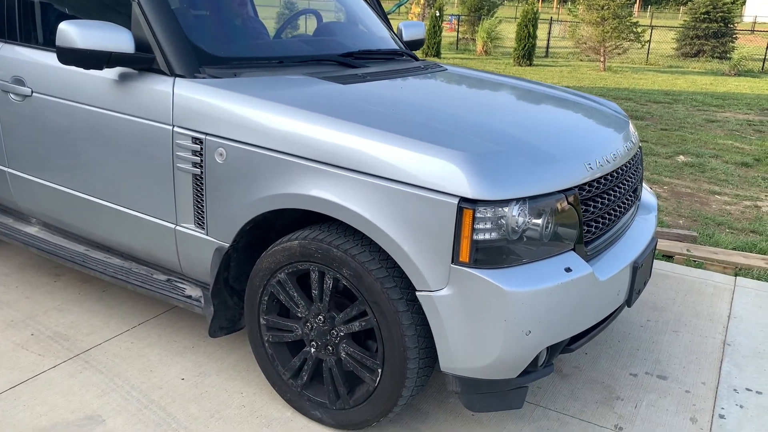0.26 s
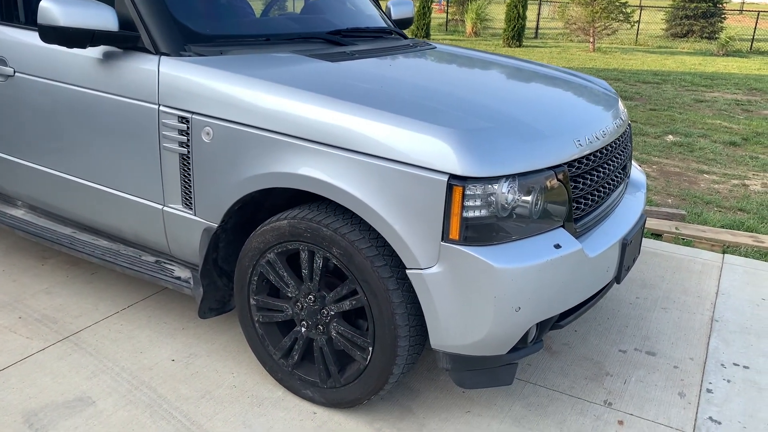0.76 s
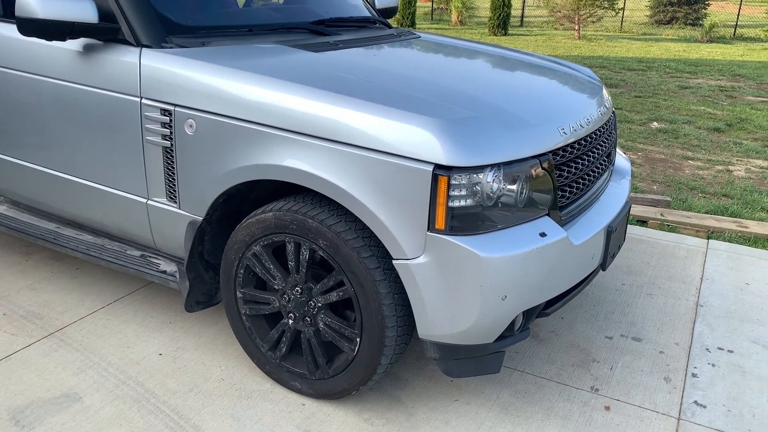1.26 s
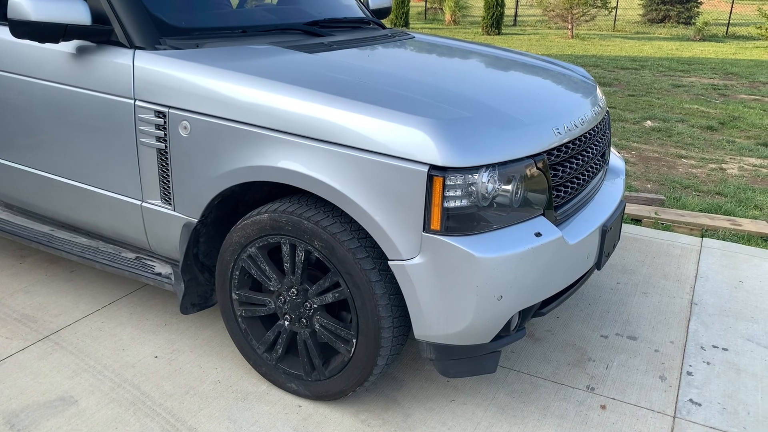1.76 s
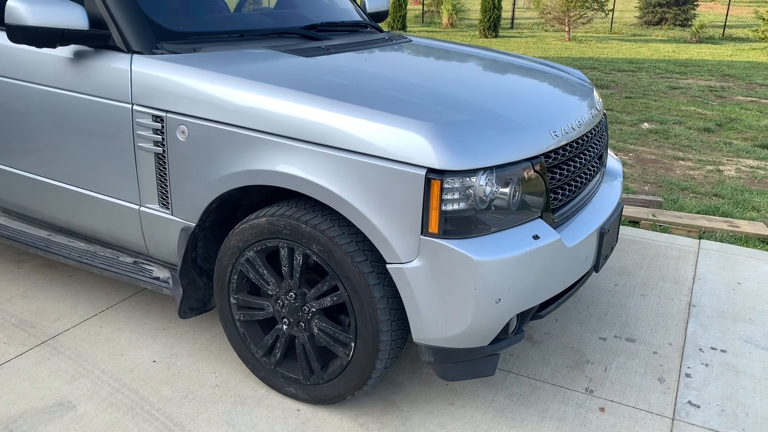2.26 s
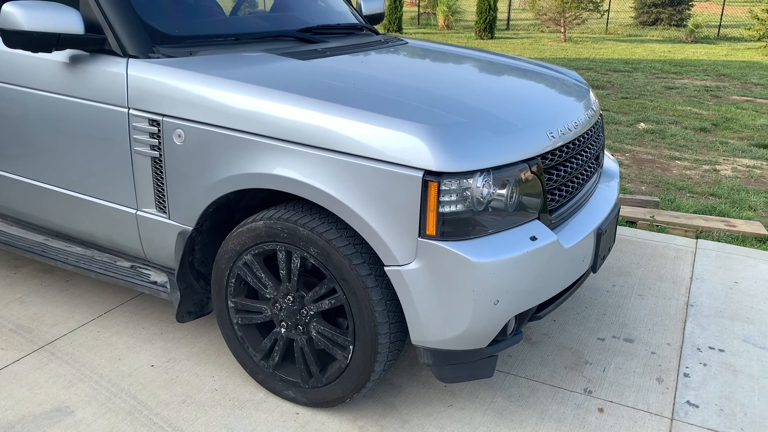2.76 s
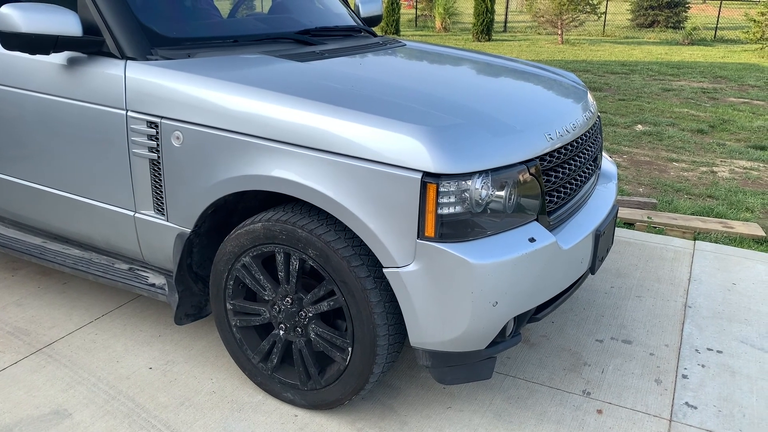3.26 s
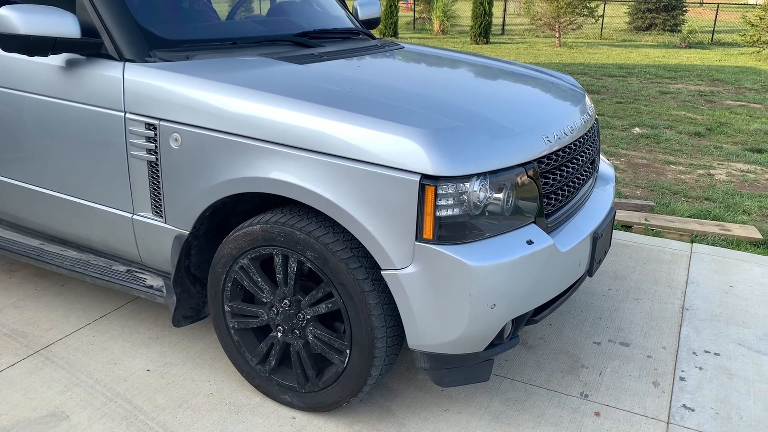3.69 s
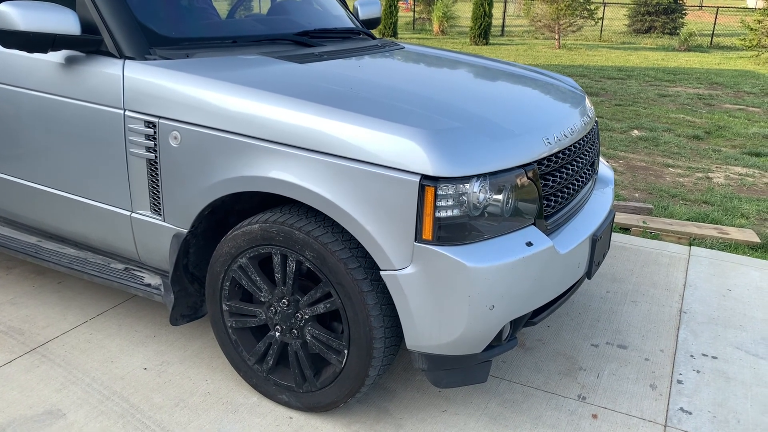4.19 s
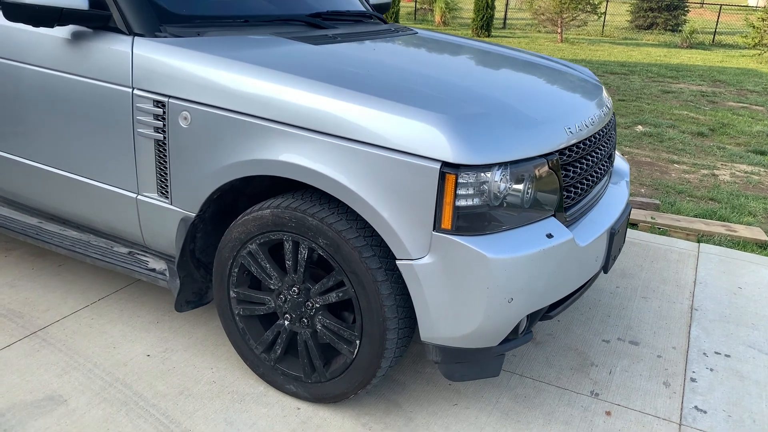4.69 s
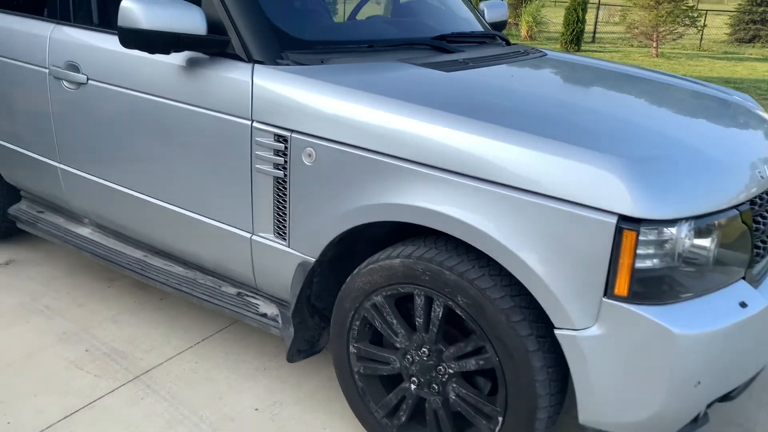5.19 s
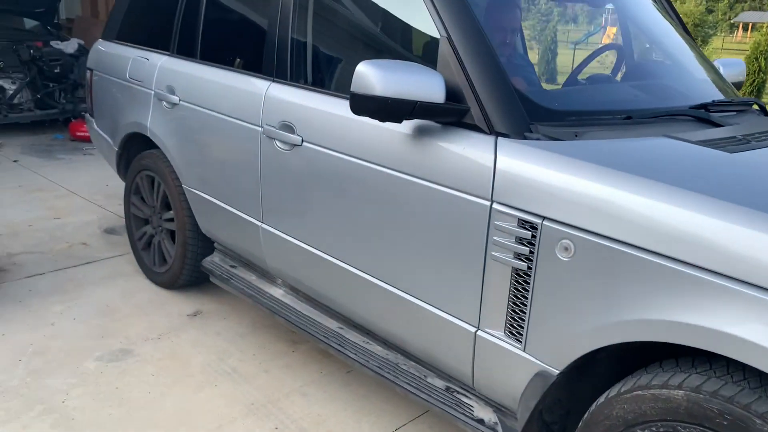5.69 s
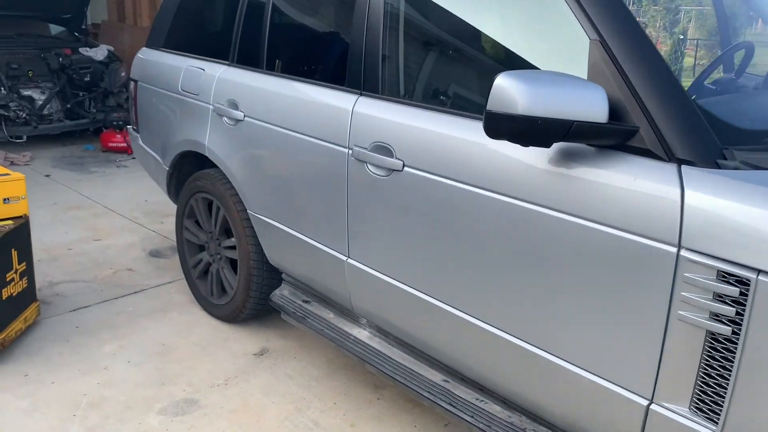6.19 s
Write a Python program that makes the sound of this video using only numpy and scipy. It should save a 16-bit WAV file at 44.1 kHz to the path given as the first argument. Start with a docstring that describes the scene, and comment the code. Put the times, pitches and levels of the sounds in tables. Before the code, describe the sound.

A petrol V8 idles fast outdoors with a dying belt rasp, settles lower, ticking and humming while breeze thumps the microphone.

```python
"""A fast idle with a belt rasp that dies away: a petrol V8 just started on a driveway, sinking to about 670 rpm.
The exhaust hums as sines on the crank orders, uneven knocks ring filters of the block near 1 kHz,
and valve ticks swell the shaped noise of clatter and of belt-and-fan hiss.
Puffs of breeze, short bursts of low noise, buffet the hand-held microphone.
Near the end it turns from the bonnet to the flank of the car."""
import sys
import numpy as np
from scipy import signal
from scipy.fft import rfft, irfft
from scipy.io import wavfile
from scipy.ndimage import uniform_filter1d, map_coordinates

SR = 44100
rng = np.random.default_rng(int(sys.argv[2]) if len(sys.argv) > 2 else 0)


def wav_record(signal):
    """Record a signal, one row per channel, as 16-bit PCM in the file named by sys.argv[1]."""
    frames = np.transpose(np.atleast_2d(signal))
    bounded = np.clip(frames, -1, 1)
    # unit amplitude maps onto the largest positive 16-bit level
    quanta = np.round(bounded * 32767).astype(np.int16)
    wavfile.write(sys.argv[1], SR, quanta)


N = 284004
TIME = np.arange(N) / SR
HZ = np.maximum(np.arange(N // 2 + 1) * SR / N, 1)
SIDES = np.array([[1], [-1]])  # left, right
IDLE_REV_PER_S, FAST_IDLE_REV_PER_S = 11.2, 14.6


def from_db(db):
    """Decibels to gain."""
    return 10 ** (np.asarray(db) / 20)


def rms_one(x):
    """Scale to unit power."""
    return x / np.sqrt(np.mean(x ** 2) + 1e-20)


def in_time(rows):
    """Each column of a curve at every sample."""
    s, *columns = np.transpose(rows)
    return [np.interp(TIME, s, column) for column in columns]


def at_hz(points):
    """A table over log frequency at every FFT bin."""
    hz, value = np.transpose(points)
    return np.interp(np.log(HZ), np.log(hz), value)


def drift(rate_per_s):
    """Slow chance with spread 1."""
    knots = rng.standard_normal(1024)
    return np.interp(TIME * rate_per_s, np.arange(len(knots)), knots) * np.sqrt(3 / 2)


def band(x, low_hz, high_hz, order=2):
    """Butterworth band-pass."""
    return signal.sosfilt(signal.butter(order, [low_hz, high_hz], "band", fs=SR, output="sos"), x)


def low_pass(order, cutoff_hz):
    """Butterworth low-pass sections."""
    return signal.butter(order, cutoff_hz, fs=SR, output="sos")


def lag_left(x, lag_s):
    """Delay the left side against the right (a negative lag advances it), reading between samples."""
    fine = signal.resample_poly(x[0], 4, 1)
    left = np.interp((TIME - lag_s) * SR * 4, np.arange(len(fine)), fine)
    return np.array([left, x[1]])


# likeness of the engine's noise on the two sides: (frequency [Hz], correlation [-1 to 1])
LIKENESS = [(50, 0.58), (170, 0.62), (400, 0.78), (700, .15), (1100, 0.78), (1600, 0.57), (2200, 0.65),
            (3100, 0), (4200, 0.74), (6000, 0)]


def machine_noise(turns, spectrum, repeat, likeness=LIKENESS):
    """Coloured stereo noise of unit power; a share of it repeats with every revolution."""
    grid = np.linspace(0, 1, 4096)
    rows = rng.standard_normal((2, len(grid)))
    cycle = np.array([rms_one(np.interp(turns % 1, grid, row)) for row in rows])
    fresh = rng.standard_normal((2, N))
    mid, side = rfft(np.sqrt(repeat) * cycle + np.sqrt(1 - repeat) * fresh)
    alike = np.clip(at_hz(likeness), -1, 1)
    both = np.sqrt(1 + alike) * mid + np.sqrt(1 - alike) * side * SIDES
    return rms_one(irfft(both * from_db(at_hz(spectrum)), N))


def fast_share(speed):
    """0 at the settled idle, 1 at the fast idle."""
    return (speed - IDLE_REV_PER_S) / (FAST_IDLE_REV_PER_S - IDLE_REV_PER_S)


def part_level(speed, flank, idle_db, fast_db, arch_db, flank_db):
    """Level in dB of an engine part: idle level plus gains at fast idle, by the wheel arch (halfway) and flank."""
    arch = 4 * flank * (1 - flank)
    return idle_db + fast_db * fast_share(speed) + arch_db * arch + flank_db * flank


def beat_times(turns, positions, jitter_s):
    """When the crank passes each position, a little early or late: one row per revolution."""
    due = np.arange(int(turns[-1]) + 1)[:, None] + positions
    return np.interp(due, turns, TIME, right=-1) + jitter_s * rng.standard_normal(due.shape)


def beats(s, db, spread_db):
    """A click at each time, each a little off in strength."""
    gain = from_db(db + spread_db * rng.standard_normal(s.shape))
    heard = (s > 0) & (s < TIME[-1])
    return np.bincount((s[heard] * SR).astype(int), gain[heard], N)


def fade(clicks, decay_s):
    """Each click becomes an envelope that dies away; unit power."""
    return rms_one(signal.lfilter([1], [1, -np.exp(-1 / (decay_s * SR))], clicks + 1e-18))


GUST_ROUNDNESS = 1.5


def swell(s, attack_s, release_s):
    """Attack and release with soft skirts."""
    return np.exp(-1.7 * np.abs(s / np.where(s < 0, attack_s, release_s)) ** GUST_ROUNDNESS)


WIDE_BELOW_HZ = 230  # the deepest eddies differ most between the sides


def eddies(bottom_hz, top_hz, knee_share, width, size):
    """Low stereo noise of even loudness between two edges, sloping down from a knee."""
    hz = np.fft.rfftfreq(size, 1 / SR) + 1
    bottom_edge = 1 + (bottom_hz / hz) ** 8
    knee = 1 + (hz / (knee_share * top_hz)) ** 2
    top_edge = 1 + (hz / top_hz) ** 14
    power = 1 / (bottom_edge * knee * top_edge)
    flow = irfft(rfft(rng.standard_normal((2, size))) * np.sqrt(power))
    mid, side = flow / np.sqrt(uniform_filter1d(flow ** 2, size=SR // 50) + 1e-12)
    side = signal.sosfilt(low_pass(1, WIDE_BELOW_HZ), side)
    return mid + width * side * SIDES


# gusts on the microphone:
# (peak time [s], level [dB], rise [s], fall [s], bottom edge [Hz], top edge [Hz])
GUSTS = [(0.37, -24.5, .04, 0.065, 58, 126), (0.843, -24, 0.024, 0.024, 50, 130),
         (0.896, -19.5, 0.033, 0.04, 55, 159), (0.974, -25.5, 0.038, 0.062, 54.6, 148),
         (1.156, -15.5, 0.029, 0.019, 47.7, 123), (1.175, -15.5, .014, 0.025, 270, 420),
         (1.205, -23.5, 0.077, 0.073, 50, 460), (1.247, -23, 0.02, 0.021, 201, 480),
         (1.44, -31, .025, 0.035, 79.3, 180), (1.518, -25, 0.029, 0.037, 75, 185),
         (1.666, -19, .012, 0.0099, 80.6, 238), (2.026, -27, .017, 0.057, 57.4, 297),
         (2.098, -13, .018, 0.032, 44.7, 292), (2.16, -26.5, 0.039, 0.02, 230, 357),
         (2.208, -23.5, 0.027, 0.053, 99, 373), (2.365, -14.5, 0.031, 0.02, 60, 218),
         (2.409, -15.5, 0.06, 0.067, 51.3, 384), (2.596, -22, .025, 0.018, 77, 257),
         (2.683, -15.5, .003, .018, 240, 720), (2.686, -12.5, .009, .019, 85, 240),
         (2.726, -18.5, .02, .01, 80, 280), (2.749, -18.5, .011, .033, 100, 450),
         (2.819, -27, .01, 0.017, 66, 163), (3.09, -29, .012, 0.025, 110, 420),
         (3.45, -30.5, 0.035, .04, 90, 260), (4.841, -18, 0.025, 0.021, 88, 253),
         (4.895, -17, .019, .025, 55.3, 140), (4.93, -17, .012, 0.011, 84, 222),
         (4.979, -23.5, 0.014, 0.012, 172, 280), (5.257, -15.5, 0.013, .016, 68.3, 163),
         (5.528, -17.5, .013, 0.017, 51.9, 120), (5.752, -18.5, 0.04, 0.036, 49.7, 497),
         (5.796, -17, 0.015, 0.016, 132, 280), (5.815, -24.5, 0.018, 0.017, 110, 500),
         (5.97, -27, .053, 0.12, 87, 322), (6.067, -18.5, .01, 0.012, 159, 420)]
FLUTTER_DB, FLUTTER_PER_S = 1, 90  # the gusts break into lumps


def wind(knee_share, width):
    """Each gust swells and dies on the microphone ports, fluttering as it goes."""
    out = np.zeros((2, N))
    size = 16384
    s_from_peak = (np.arange(size) - size / 2) / SR
    for s, db, rise_s, fall_s, bottom_hz, top_hz in GUSTS:
        start = int(s * SR) - size // 2
        gust = swell(s_from_peak, rise_s, fall_s) * eddies(bottom_hz, top_hz, knee_share, width, size)
        out[:, start:start + size] += from_db(db) * gust
    return out * from_db(FLUTTER_DB * drift(FLUTTER_PER_S))


# valve closings of one revolution: (crank position [turns], clatter tick [dB], hiss tick [dB])
TICKS = [(.01, 5, -3), (.2, -15, -6), (.37, 11.5, 1), (.48, 6.5, 17.5), (.61, -2, -7), (.73, 4.5, 11),
         (.85, 5, 16)]


def valve_ticks(turns, tick_db, depth, decay_s, spread_db):
    """Gain that flares up at each valve closing; unit power."""
    s = beat_times(turns, np.array(TICKS)[:, 0], jitter_s=.0006)
    ticks = uniform_filter1d(fade(beats(s, tick_db, spread_db), decay_s), size=SR // 400)
    return rms_one(np.sqrt(1 + (depth * ticks) ** 2))


# spectrum of the belt-and-fan hiss: (frequency [Hz], relative density [dB per Hz])
HISS = [(1000, 2), (2800, -0.5), (3600, 8.5), (4600, 2.5), (5500, 2), (7000, 1), (8000, 1.5), (9000, -0.5),
        (10500, -3), (11800, -0.5), (13400, -0.5), (14300, 3), (14800, -19), (16000, -30)]
# likeness of the hiss on the two sides: (frequency [Hz], correlation [-1 to 1])
HISS_LIKENESS = [(3000, 0), (4300, 0.055), (5300, 0.019), (7000, 0.45), (8600, 0.5), (9800, 1), (14000, 1)]
# level at the settled idle; gains at fast idle, wheel arch, flank [dB]
HISS_DB = dict(idle_db=-38.5, fast_db=1.5, arch_db=1.5, flank_db=-1.5)
HISS_LAG_S = .000297


def belt_and_fan_hiss(turns, speed, flank):
    """Belts and fan hiss as high noise, in which the valves tick briefly."""
    level_db = part_level(speed, flank, **HISS_DB) + 0.78 * drift(8)
    noise = machine_noise(turns, HISS, repeat=0.18, likeness=HISS_LIKENESS)
    tick_db = np.array(TICKS)[:, 2]
    return from_db(level_db) * noise * valve_ticks(turns, tick_db, depth=0.31, decay_s=0.0025, spread_db=2.5)


# spectrum of the belt's rasp: (frequency [Hz], relative density [dB per Hz])
RASP = [(900, -13), (1250, 1), (1700, 5.5), (2200, -4), (3000, 4), (3700, -4), (4600, 5), (5600, -1),
        (7000, -6), (10300, -4.5), (14400, -10), (14900, -30)]
RASP_DB, RASP_FALL_DB_PER_S = -36, 8


def belt_rasp(turns, grains_per_s, grain_s, spread_db):
    """Just after the start the belt rasps on its pulleys in tiny slips; this dies away."""
    s = np.cumsum(rng.exponential(1 / grains_per_s, 4096))
    grain = fade(beats(s, 0, spread_db), grain_s)
    noise = machine_noise(turns, RASP, repeat=0.24, likeness=HISS_LIKENESS)
    return from_db(RASP_DB - RASP_FALL_DB_PER_S * TIME) * grain * noise


# spectrum of the air drawn in: (frequency [Hz], relative density [dB per Hz])
INTAKE = [(150, -24), (270, -8), (345, -3.5), (440, -.5), (540, -13.5), (750, -18), (1500, -51)]
# likeness of the intake on the two sides, clipped to -1..1: (frequency [Hz], correlation)
INTAKE_LIKENESS = [(200, 0), (290, -1.3), (400, 0.71), (700, -0.29)]
# level at the settled idle; gains at fast idle, wheel arch, flank [dB]
INTAKE_DB = dict(idle_db=-49.5, fast_db=13, arch_db=1, flank_db=-12.5)


def air_intake(turns, speed, flank):
    """Drawn-in air rushes as noise, partly repeating each revolution; strongest at the fast idle."""
    noise = machine_noise(turns, INTAKE, repeat=0.44, likeness=INTAKE_LIKENESS)
    return from_db(part_level(speed, flank, **INTAKE_DB)) * noise


# spectrum of the rumble: (frequency [Hz], relative density [dB per Hz])
RUMBLE = [(15, -34), (25, -22), (35, -12), (50, 3), (75, 1), (130, 2), (200, -4.5), (290, -8), (380, -6),
          (450, -17), (530, -20), (800, -12.5), (1500, -53)]
# level at the settled idle; gains at fast idle, wheel arch, flank [dB]
RUMBLE_DB = dict(idle_db=-33.5, fast_db=-0.5, arch_db=3, flank_db=0)


def engine_rumble(turns, speed, flank):
    """Low noise, partly repeating each revolution, its level wavering."""
    level_db = part_level(speed, flank, **RUMBLE_DB) + 2.74 * drift(14)
    return from_db(level_db) * machine_noise(turns, RUMBLE, repeat=0.23)


PANEL_RIPPLE_DB, PANEL_SPACING_HZ, PANEL_CHANGES_PER_S = 2.3, 40, 1.5


def panel_ripple(hz, s):
    """Small panel modes leave fine peaks and dips, shifting slowly as the hand moves; dB by frequency and time."""
    place = np.meshgrid(hz / PANEL_SPACING_HZ, s * PANEL_CHANGES_PER_S, indexing="ij")
    return PANEL_RIPPLE_DB * map_coordinates(rng.standard_normal((600, 16)), place, order=3, mode="mirror")


# resonances of covers and brackets, before waver and losses:
# (centre [Hz], width [Hz], height [dB])
COVERS = [(804, 56, 5.5), (1268, 44, 6), (1535, 41, 4.5), (1704, 61, 5.5), (2025, 42, 5.5), (2120, 30, 2),
          (2207, 39, 5), (2410, 68, 2.5), (3130, 41, 4), (3586, 116, 6), (3930, 60, 4), (4226, 71, 7.5),
          (4580, 430, 5.5), (5550, 42, -6), (6810, 115, 6), (7590, 150, 6.5), (8090, 230, 5),
          (8230, 230, 5), (10730, 310, 5)]
# shares of height: waver, loss on the flank, loss at fast idle; share of pitch: wander
COVER_WAVER, COVER_FLANK_LOSS, COVER_FAST_LOSS, COVER_WANDER = 0.3, .21, .45, .008
FLANK_TREBLE_DB, FLANK_TREBLE_HZ = 4.5, 12500  # the flank lets out more of the highest hiss


def covers(x, flank, speed):
    """Covers and brackets colour the sound; each resonance wavers in height and wanders in pitch."""
    hz, s, frames = signal.stft(x, SR, nperseg=2048)
    along = np.interp(s, TIME, flank)
    fast = np.clip(fast_share(np.interp(s, TIME, speed)), 0, 1)
    treble_db = FLANK_TREBLE_DB / (1 + (FLANK_TREBLE_HZ / (hz + 1)) ** 12)
    gain_db = np.outer(treble_db, along) + panel_ripple(hz, s)
    kept = 1 - COVER_FLANK_LOSS * along - COVER_FAST_LOSS * fast
    for centre_hz, width_hz, db in COVERS:
        share = (1 + COVER_WAVER * np.interp(s, TIME, drift(7))) * kept
        moved_hz = centre_hz * (1 + COVER_WANDER * np.interp(s, TIME, drift(3)))
        gain_db = gain_db + db * share / (1 + (2 * (hz[:, None] - moved_hz) / width_hz) ** 2)
    return signal.istft(frames * from_db(gain_db), SR)[1][:, :N]


# clatter through the grille: (frequency [Hz], relative density [dB per Hz])
GRILLE_CLATTER = [(250, -13), (450, -3), (600, -9.5), (900, 1), (1200, 5), (1450, 0), (1900, 0),
                  (2400, 3.5), (3000, -4), (4500, -8.5), (7000, -15.5), (15000, -43)]
# clatter out of the wheel arch: (frequency [Hz], relative density [dB per Hz])
ARCH_CLATTER = [(250, -10), (500, 8), (660, 0.5), (850, 9), (1150, 8.5), (1430, 5), (1900, 2.5), (2300, 1),
                (2700, 0), (3100, -1), (3600, 3.5), (4500, -5.5), (5600, -5), (15000, -57)]
# level at the settled idle; gains at fast idle, wheel arch, flank [dB]
CLATTER_DB = dict(idle_db=-38, fast_db=5.5, arch_db=-0.7, flank_db=2)
CLATTER_SWELL_S, CLATTER_SWELL_DB = .32, 3  # initial build-up


def valve_clatter(turns, speed, flank):
    """Noise flaring at the valve closings, through the grille at first, then out of the wheel arch."""
    grille = machine_noise(turns, GRILLE_CLATTER, repeat=0.23)
    arch = machine_noise(turns, ARCH_CLATTER, repeat=0.55)
    missing_db = CLATTER_SWELL_DB * np.maximum(1 - TIME / CLATTER_SWELL_S, 0)
    level_db = part_level(speed, flank, **CLATTER_DB) - missing_db + drift(8.3)
    noise = np.sqrt(1 - flank) * grille + np.sqrt(flank) * arch
    tick_db = np.array(TICKS)[:, 1]
    return from_db(level_db) * noise * valve_ticks(turns, tick_db, depth=0.7, decay_s=0.023, spread_db=4.5)


# knocks of one revolution: (crank position [turns], settling strength [dB], settled strength [dB])
KNOCKS = [(0.119, 5.5, -5), (.33, -3.5, -7), (0.471, 1.5, -1.5), (0.59, -9, -9), (.705, 1, 2),
          (.87, 3.5, -3.5)]
# ring of the block: (low edge [Hz], high edge [Hz], relative gain [dB])
BLOCK = [(1003.3, 1052, 4), (1085.6, 1112, 0.5), (1203, 1300, -10.5)]
# level of the ring: (time [s], level [dB])
RING_LEVEL = [(0, -57), (.35, -42), (.9, -45), (1.1, -35), (1.35, -35), (1.7, -39), (2.35, -35),
              (2.8, -37.5), (4.6, -32.5), (5.2, -32), (5.55, -34), (6.44, -37.5)]
SETTLED_S, SETTLING_S = 3.65, .4  # middle and length of the shift in accents


def block_ring(turns, rattle, rub, width, evenness):
    """Uneven knocks, each with a short rattle, and a steady rub excite the block's bands near 1 kHz."""
    positions, early_db, late_db = np.transpose(KNOCKS)
    s = beat_times(turns, positions, jitter_s=.00008)
    settled = np.clip((s - SETTLED_S) / SETTLING_S + .5, 0, 1)
    clicks = beats(s, early_db + settled * (late_db - early_db), spread_db=1.0)
    shake = np.hypot(rattle * fade(clicks, decay_s=0.0034), rub) * rng.standard_normal((2, N))
    drive = rms_one(clicks) + shake[0] + width * shake[1] * SIDES
    ring = sum(from_db(db) * band(drive, low_hz, high_hz) for low_hz, high_hz, db in BLOCK)
    # partly level out the loudness over 1/18 s
    power = uniform_filter1d(np.mean(ring ** 2, axis=0), size=SR // 18) + 1e-12
    return from_db(in_time(RING_LEVEL)[0]) * rms_one(ring / power ** (evenness / 2))


# exhaust hum before pipe boom: (multiple of crank speed, relative level [dB])
HUM_ORDERS = [(3, -4.5), (4, -16.5), (5, -6), (6, -22), (7, -11), (8, -11.5), (9, -6), (10, -7.5),
              (10.5, -10), (11, -10.5), (13, -23), (21, -17.5), (22, -12.5), (24, -18), (30, -8.5),
              (32, -8.5), (34, -14), (40, -9.5)]
# resonances of the exhaust pipe: (centre [Hz], width [Hz], height [dB])
PIPE = [(59.3, 37, 17.5), (89, 7.3, 15.5)]
# level of the hum: (time [s], level [dB])
HUM_LEVEL = [(0, -33.5), (1.1, -37.5), (1.7, -31), (3, -33), (4, -29.5), (4.7, -31), (5.1, -34),
             (6.44, -30)]


def exhaust_hum(turns, waver_db, waver_rad):
    """Crank orders as sines, wavering with the combustion; those that meet a pipe resonance boom."""
    rev_per_s = np.gradient(turns) * SR
    out, power = 0, 0
    for order, db in HUM_ORDERS:
        order_hz = order * rev_per_s
        boom_db = sum(peak_db / (1 + (2 * (order_hz - hz) / width_hz) ** 2) for hz, width_hz, peak_db in PIPE)
        gain = from_db(db + boom_db)
        phase = 2 * np.pi * (order * turns + rng.random()) + waver_rad * drift(5.8)
        out = out + gain * from_db(waver_db * drift(6)) * np.sin(phase + 0.5 * SIDES)
        power = power + gain ** 2
    return from_db(in_time(HUM_LEVEL)[0]) * rms_one(out / np.sqrt(power))


# crankshaft speed, sinking from the fast idle: (time [s], speed [rev/s])
CRANK = [(0, 14.56), (.5, 14.62), (1.75, 12.06), (2.25, 12.2), (2.75, 11.03), (4.25, 11.35), (4.5, 11.56),
         (4.75, 10.97), (5.75, 11.4)]
# microphone turns from bonnet to flank: (time [s], lag of the left side [s], flank share [0-1])
TURN = [(0, -.00003, 0), (4.8, -.00005, .05), (5.2, .00009, .5), (5.7, .0002, .95), (6.44, .00022, 1)]


def scene():
    """One crankshaft drives all the engine's parts; the wind blows over them."""
    speed, = in_time(CRANK)
    turns = np.cumsum(speed) / SR
    lag_s, flank = in_time(TURN)
    gusts = wind(knee_share=.42, width=0.81)
    hiss = lag_left(belt_and_fan_hiss(turns, speed, flank), HISS_LAG_S)
    rasp = lag_left(belt_rasp(turns, grains_per_s=550, grain_s=0.0016, spread_db=1.5), HISS_LAG_S)
    intake = air_intake(turns, speed, flank)
    rumble = engine_rumble(turns, speed, flank)
    clatter = lag_left(valve_clatter(turns, speed, flank), lag_s)
    ring = lag_left(block_ring(turns, rattle=0.57, rub=0.24, width=0.52, evenness=0.58), lag_s)
    hum = exhaust_hum(turns, waver_db=1.8, waver_rad=0.046)
    bonnet = ring + covers(clatter + hiss, flank, speed) + rasp
    return hum + rumble + intake + bonnet * from_db(-.3 * SIDES) + gusts


# SQUEEZE: dB taken off per dB over the threshold
THRESHOLD_DB, SQUEEZE, RECOVERY_DB_PER_S = -17.5, 0.25, 3.5


def gain_control(x):
    """Loud buffets push the gain down; it creeps back up."""
    level_db = 10 * np.log10(uniform_filter1d(np.mean(x ** 2, axis=0), size=SR // 50) + 1e-12)
    recovery_db = RECOVERY_DB_PER_S * TIME
    wanted_db = SQUEEZE * np.maximum(level_db - THRESHOLD_DB, 0)
    cut_db = np.maximum.accumulate(wanted_db + recovery_db) - recovery_db
    return x * from_db(-cut_db)


LOW_CUT_HZ, CUTOFF_HZ = 33, 15700
PEAK_CEILING = 0.6


def record(dry):
    """Bass starts centred and widens; deepest bass cut; loud peaks ducked and rounded off; top cut."""
    mid, side = dry.mean(axis=0), (dry[0] - dry[1]) / 2
    bass = signal.sosfiltfilt(low_pass(2, 160), side)
    centred = bass * np.interp(TIME, [.7, 1.5], [1, 0])
    both = mid + centred + (side - centred) * SIDES
    both = signal.sosfilt(signal.butter(4, LOW_CUT_HZ, "high", fs=SR, output="sos"), both)
    both = gain_control(both)
    both = both / (1 + (both / PEAK_CEILING) ** 4) ** .25
    return signal.sosfilt(signal.ellip(12, .1, 90, CUTOFF_HZ, fs=SR, output="sos"), both)


dry = scene()
out = record(dry)
wav_record(out)
```